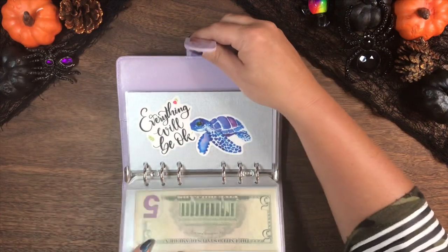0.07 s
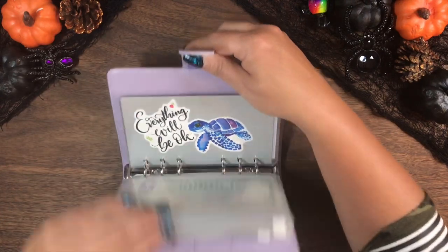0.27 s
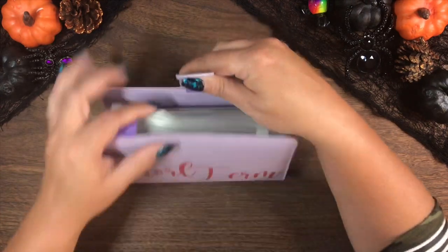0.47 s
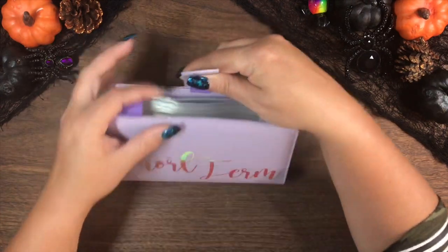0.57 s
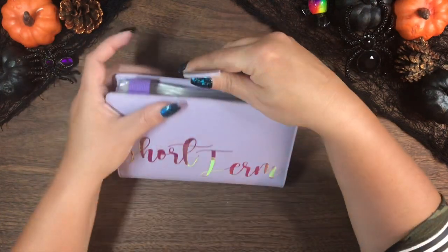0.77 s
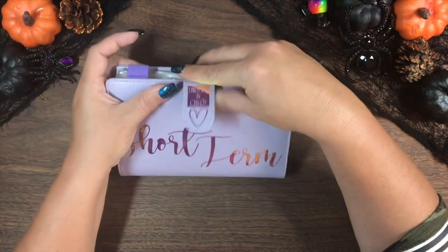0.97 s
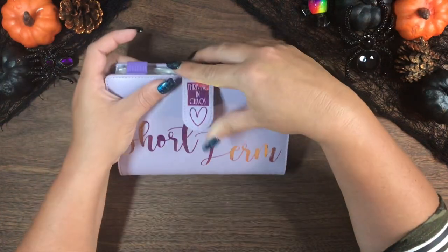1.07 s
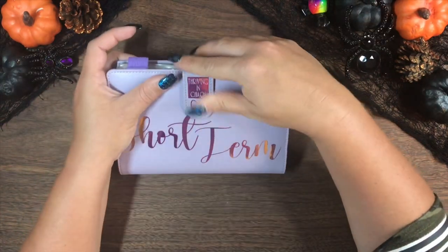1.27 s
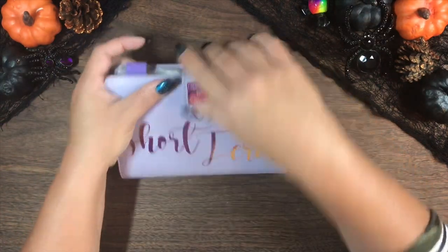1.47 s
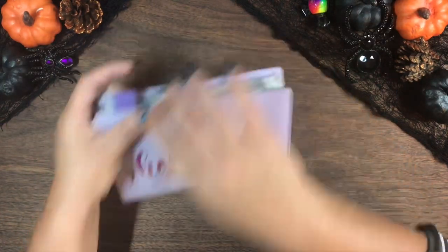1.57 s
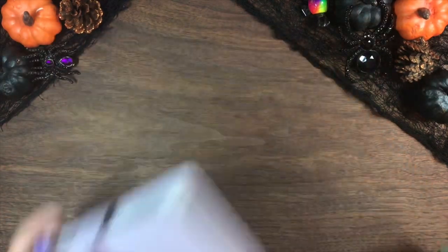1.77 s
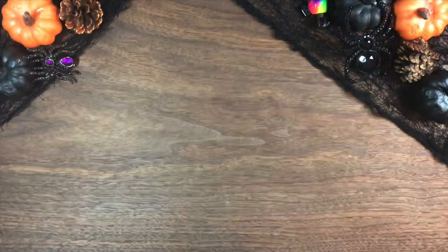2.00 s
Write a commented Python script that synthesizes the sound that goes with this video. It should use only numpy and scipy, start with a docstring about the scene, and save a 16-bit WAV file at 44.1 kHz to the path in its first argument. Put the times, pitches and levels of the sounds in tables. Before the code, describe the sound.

One hard, dry snap of a binder strap, with a short room echo. Faint sleeve rustle comes before, crisper handling crackle and sliding after, over low steady room noise, heard closely in mono.

```python
"""A padded ring binder is folded shut on a wooden table in a quiet room.
Over steady room noise, plastic sleeves and cover rub (filtered random grains) and crackle (short noise puffs).
At about 1 s the strap's stud snaps home (ringing modes); binder, table and room answer (decaying noise bands).
From 1.7 s the crackling is strongest, and then the binder slides away and its top treble fades.
Near 2 s the sound dips out briefly, and a last whistling scrape (resonant noise) begins."""
import sys
import numpy as np
from scipy import signal
from scipy.fft import rfft, irfft
from scipy.io import wavfile

SR = 44100
rng = np.random.default_rng(int(sys.argv[2]) if len(sys.argv) > 2 else 0)


def wav_record(signal):
    """Record a signal, one row per channel, as 16-bit PCM in the file named by sys.argv[1]."""
    frames = np.transpose(np.atleast_2d(signal))
    bounded = np.clip(frames, -1, 1)
    # unit amplitude maps onto the largest positive 16-bit level
    quanta = np.round(bounded * 32767).astype(np.int16)
    wavfile.write(sys.argv[1], SR, quanta)


def undo_db(level):
    """Turn decibels back into plain size, where 20 dB means ten times bigger."""
    steps = np.asarray(level, float) / 20
    return 10 ** steps


N = 89787  # length [samples]


def rms_one(x):
    """Normalisation: divide a signal by its root mean square."""
    return x / np.sqrt(np.mean(x ** 2) + 1e-20)


def at_hz(points, hz):
    """Spectral interpolation: read a table linearly over logarithmic frequency."""
    table_hz, values = np.array(points).T
    return np.interp(np.log(hz), np.log(table_hz), values)


def drift(rate_hz):
    """Slow random modulation: white noise through two equal low-pass poles, scaled to rms 1."""
    step = 40  # computed at every 40th sample, then interpolated
    pole = np.exp(-2 * np.pi * rate_hz * step / SR)
    noise = rng.standard_normal(N // step + 2002)
    slow = signal.lfilter([1], [1, -2 * pole, pole * pole], noise)[2000:]  # skip the settling
    return np.interp(np.arange(N) / step, np.arange(len(slow)), rms_one(slow))


def bands(source, spectrum):
    """Third-octave analysis: (centres [Hz], band signals) from two coloured sources; the sum has rms 1."""
    edges = 22 * 2 ** (np.arange(30) / 3)
    centres = np.sqrt(edges[1:] * edges[:-1])
    size = source.shape[1]
    bin_hz = np.arange(1, size // 2 + 2) * SR / size
    coloured = irfft(rfft(source) * undo_db(at_hz(spectrum, bin_hz)), size)
    parts = []
    for k in range(len(centres)):
        band = signal.butter(2, edges[k:k + 2], "band", fs=SR, output="sos")
        parts.append(signal.sosfilt(band, coloured[k % 2]))  # neighbouring bands use different sources
    parts = np.array(parts)
    return centres, parts / np.sqrt(np.mean(np.sum(parts, axis=0) ** 2))


# Spectrum of the air and rumble in the room: (frequency [Hz], relative density [dB per Hz])
ROOM_TONE = [(25, -17), (133, -4.5), (179, -10), (371, -16), (654, -19), (729, -16.5), (1060, -18.5),
             (1250, -20.5), (4100, -23), (15800, -31.5)]


def room_tone():
    """Stationary noise: steady air and rumble, with a slow level modulation of the bass."""
    level_db, waver_db, waver_hz = -67.5, 2.0, 2.2  # rms before the wavering; rms of the wavering; its rate
    hz, parts = bands(rng.standard_normal((2, N)), ROOM_TONE)
    bass = (hz < 500)[:, None]
    return undo_db(level_db) * np.sum(parts * undo_db(bass * waver_db * drift(waver_hz)), axis=0)


# Hands and cover rubbing: (time [s], level above the split [dB], level below the split [dB])
RUB = [(0, -62.5, -66.5), (.08, -62.5, -67), (.17, -58, -65.5), (.25, -60, -66.5), (.322, -59.5, -65.5),
       (.335, -53.5, -56), (.42, -64, -63.5), (.49, -62.5, -63), (.58, -69.5, -68), (.7, -63, -67.5),
       (0.789, -68.5, -68.5), (0.859, -61, -66.5), (1.001, -68.5, -68.5), (1.1, -84.5, -78),
       (1.29, -78, -71.5), (1.391, -62.5, -68.5), (1.471, -61, -70.5), (1.55, -69.5, -71),
       (1.684, -69.5, -76), (1.688, -53, -73), (1.72, -53.5, -59), (1.745, -58.5, -71.5), (1.8, -57, -68),
       (1.84, -54, -63), (1.95, -59.5, -63.5), (2.04, -54, -61.5)]
# Colour the cover gives to the friction: (frequency [Hz], gain [dB])
RUB_COLOUR = [(150, -14.5), (250, 0), (500, -8.5), (900, -3), (1250, -8.5), (2300, -3), (3500, 1.5),
              (4750, 2.5), (5300, -5), (7300, -2.5), (12300, -7), (15800, -12.5)]


def rub():
    """Friction as random micro-impacts: uneven grains over noise; treble and middle swell apart."""
    grains_per_s, grain_spread_db = 2300, 4
    split_hz, patchy_db, patchy_hz = 2500, 2.5, 15.0
    dull_s, dull_hz, dull_db_per_s = 1.7964, 5500, -29.5  # the sliding binder moves off, its top treble fades
    s, treble_db, middle_db = np.transpose(RUB)
    t = np.arange(N) / SR
    sizes_db = grain_spread_db * np.minimum(rng.exponential(1, (2, N)), 5)
    signs = rng.choice([-1, 1], (2, N))
    struck = rng.random((2, N)) < grains_per_s / SR
    friction = undo_db(sizes_db) * signs * struck + .5 * rng.standard_normal((2, N))
    hz, parts = bands(friction, RUB_COLOUR)
    parts = parts * undo_db([patchy_db * drift(patchy_hz) for _ in hz])  # each band wavers by itself
    parts[hz > dull_hz] *= undo_db(dull_db_per_s * np.maximum(t - dull_s, 0))
    high = hz > split_hz
    treble = rms_one(parts[high].sum(axis=0))
    middle = rms_one(parts[~high].sum(axis=0))
    return undo_db(np.interp(t, s, treble_db)) * treble + undo_db(np.interp(t, s, middle_db)) * middle


# Crackles of plastic sleeves, taps of fingers and cover:
# (time [s], peak level [dB], centre frequency [Hz], width [octaves], t60 [s])
CRACKLES = [(0.036, -57.5, 1011, 0.822, 0.01793), (0.117, -51.5, 769.2, 0.956, 0.01103),
            (0.175, -45.5, 4320, 0.2285, 0.04373), (.304, -44, 7983, 0.813, 0.004055),
            (.326, -49.5, 757.4, 0.704, 0.04007), (.332, -35.5, 5500, 2.414, 0.0071),
            (.335, -40, 2526, 1.654, 0.0096), (0.342, -38, 5500, 1.504, 0.00809),
            (0.3486, -32.5, 4287, 1.3157, 0.01099), (0.3628, -34.5, 2291, 1.3107, 0.02825),
            (0.362, -37.5, 7844, 1.073, 0.03686), (.350, -52.5, 80.86, 2.357, 0.1874),
            (0.401, -42, 4932, 1.492, 0.00858), (.427, -43.5, 1005, 2.002, 0.01043),
            (.669, -55, 863.6, 0.2512, 0.0219), (.963, -50.5, 312.5, 1.0346, .04),
            (1.142, -45.5, 2971, 1.103, 0.01202), (1.3415, -35, 1736, 2.3018, 0.01681),
            (1.408, -50, 1776, 1.69, 0.0138), (1.701, -25.5, 5016, 3.68, 0.01979),
            (1.703, -54.5, 760.5, 0.5976, 0.05525), (1.708, -28, 7992, 1.681, 0.02037),
            (1.7128, -27.5, 5808, 1.409, 0.032), (1.761, -36.5, 8000, 2.2, 0.0126),
            (1.7693, -31.5, 5971, 2.6, 0.012296), (1.825, -38, 2490, 2.445, 0.04586),
            (1.831, -36.5, 6277, 0.3188, 0.02146), (1.918, -50.5, 301.6, 3.18, 0.02933),
            (1.959, -51, 703.9, 1.614, 0.0157)]


def crackles():
    """Impulsive excitation: a tick and a short decaying puff of noise, each in a band of its own."""
    rise_share, tick_db = 0.05047, 11.5  # rise time as a share of t60; tick over noise, before filtering
    out, size = np.zeros(N + SR), SR // 10
    t = np.arange(size) / SR
    for s, db, hz, octaves, t60 in CRACKLES:
        half = 2 ** (np.clip(octaves, .2, 5) / 2)
        edges = np.clip([hz / half, hz * half], 60, .45 * SR)
        envelope = undo_db(-60 * t / t60) * (1 - np.exp(-t / (rise_share * t60)))
        tick = (t == 0) * undo_db(tick_db)
        push = rng.standard_normal(size) * envelope + tick
        puff = signal.sosfilt(signal.butter(2, edges, "band", fs=SR, output="sos"), push)
        start = int(s * SR)
        out[start:start + size] += undo_db(db) * puff / np.abs(puff).max()
    return out[:N]


# Contacts as the stud jumps in and rattles to rest: (time [s], strength [dB])
SNAP = [(1.0233, -5), (1.0241, -9.5)]
# Modes of stud and cover, the last two the humming metal rings:
# (frequency [Hz], level per unit contact before the low cut [dB], t60 [s])
STUD = [(133.5, -36.5, .14), (219.53, -24, 0.038), (335.81, -25, .05), (453.73, -27.5, 0.035),
        (656.4, -4.5, 0.016), (969.08, -7.5, 0.018), (1371.7, -15, 0.019514), (1667.3, 2, 0.0053),
        (2226.7, -2.5, 0.007), (2473.6, -12.5, 0.02), (3054.2, 3.5, .011), (3339.9, 0.5, .008),
        (3804, -18, 0.009), (4505.9, -11.5, 0.026), (5730, -13, 0.018), (6838.5, -12, 0.0078),
        (11649, -9, 0.00062), (937.02, -31.5, 0.12), (2429.6, -32, .13)]


def snap():
    """Modal synthesis: each contact sets all damped modes ringing, successive ones in opposite sense."""
    low_cut_hz = 180  # the small binder radiates no deep bass
    clicks = np.zeros(N) + 1e-18
    for s, db in SNAP:
        clicks[int(s * SR)] = -undo_db(db)
    ringing = np.zeros(N)
    for k, (hz, db, t60) in enumerate(STUD):
        radius, angle = undo_db(-60 / (t60 * SR)), 2 * np.pi * hz / SR
        feedback = [1, -2 * radius * np.cos(angle), radius * radius]
        ringing += (-1) ** k * signal.lfilter([0, undo_db(db) * np.sin(angle)], feedback, clicks)
    return signal.sosfilt(signal.butter(2, low_cut_hz, "high", fs=SR, output="sos"), ringing)


def tail(spectrum, level_db, t60s, rise_s):
    """Frequency-dependent decay: noise starts at the first contact and dies band by band."""
    size = N // 2
    t = np.arange(size) / SR
    hz, parts = bands(rng.standard_normal((2, size)), spectrum)
    t60 = np.maximum(at_hz(t60s, hz), .01)[:, None]
    dying = np.sum(parts * undo_db(-60 * t / t60), axis=0)
    out, start = np.zeros(2 * N), int(SNAP[0][0] * SR)
    out[start:start + size] = undo_db(level_db) * dying * (1 - np.exp(-t / rise_s))
    return out[:N]


# Spectrum of the shudder: (frequency [Hz], relative density [dB per Hz])
SHUDDER = [(90, -46), (300, -10), (570, -11), (720, -2.5), (1000, -0.5), (1900, -4), (2500, -0.5),
           (3100, -5.5), (4400, -10.5), (6500, -11.5), (9000, -20.5)]
# Its decay: (frequency [Hz], t60 [s])
SHUDDER_T60 = [(150, 0.09838), (1000, 0.066), (3000, 0.061), (12000, 0.0422)]


def shudder():
    """Structural damping: binder and table shudder after the snap as quickly dying noise."""
    return tail(SHUDDER, -20.5, SHUDDER_T60, rise_s=0.0021)  # level in dB before decay


# Spectrum of the room's answer: (frequency [Hz], relative density [dB per Hz])
ECHO = [(71, -45.5), (120, -16.5), (208, -9), (450, -14), (917, -7.5), (1910, -12), (2240, -6),
        (3510, -14.5), (4670, -14.5), (5170, -22), (15500, -39.5)]
# Its decay: (frequency [Hz], t60 [s])
ECHO_T60 = [(150, .25), (1000, 0.29055), (3000, 0.264), (12000, 0.24)]


def echo():
    """Diffuse reverberation: the room answers the snap with noise that builds up and dies more slowly."""
    return tail(ECHO, -36.5, ECHO_T60, rise_s=0.0047)  # level in dB before decay


# A last scrape that whistles: (frequency [Hz], width of each resonance [Hz], level before the fade-in [dB])
SCRAPE = (1918.7, 363, -54)


def scrape():
    """Resonant filtering: noise passed twice through a narrow resonance whistles near its frequency."""
    start_s, fade_in_s = 2.003, 0.00731
    hz, width_hz, db = SCRAPE
    radius = np.exp(-np.pi * width_hz / SR)
    feedback = [1, -2 * radius * np.cos(2 * np.pi * hz / SR), radius * radius]
    whistle = rng.standard_normal(N)
    for _ in range(2):
        whistle = signal.lfilter([1, 0, -1], feedback, whistle)
    gate = np.clip((np.arange(N) / SR - start_s) / fade_in_s, 0, 1)
    return undo_db(db) * rms_one(whistle) * gate


def scene():
    """Linear superposition: all sources add in one channel."""
    hit = snap() + shudder() + echo()
    return (hit + crackles() + rub() + scrape() + room_tone())[None]


def low_pass(x):
    """Removes everything above the highest recorded frequency."""
    return signal.sosfilt(signal.butter(12, 16810, fs=SR, output="sos"), x)


def record(dry):
    """Amplitude modulation and low-pass filtering: a brief fade out and in, then the top is cut."""
    dip_s, fade_out_s, fade_in_s = 1.988, 0.029843, 0.021916  # silent instant; fades before and after it
    t = np.arange(N) / SR - dip_s
    fade = np.clip(np.maximum(-t / fade_out_s, t / fade_in_s), 0, 1) ** 1.275
    top_cut = signal.cheby2(10, 60, 16800, fs=SR, output="sos")  # 60 dB down from 16800 Hz
    mix = signal.sosfilt(top_cut, dry * fade)
    return low_pass(mix)


dry = scene()
out = record(dry)
wav_record(out)
```